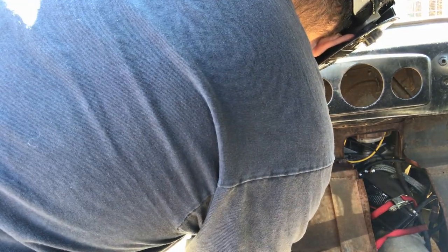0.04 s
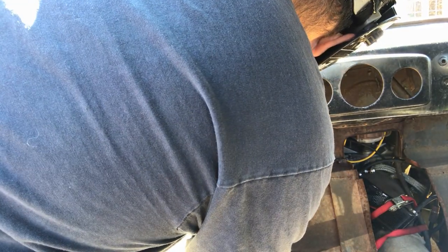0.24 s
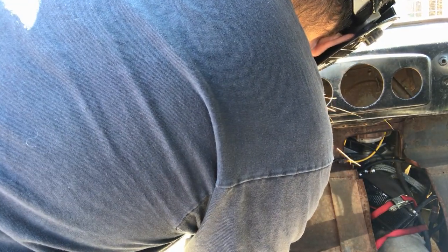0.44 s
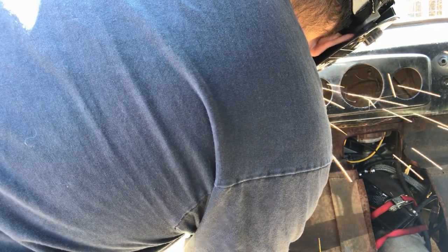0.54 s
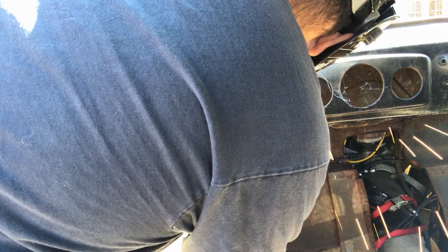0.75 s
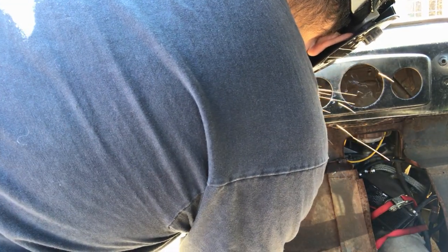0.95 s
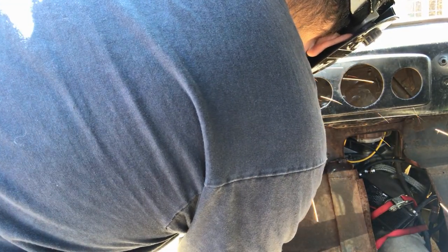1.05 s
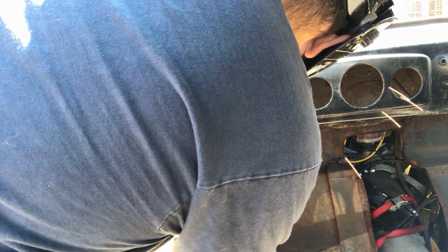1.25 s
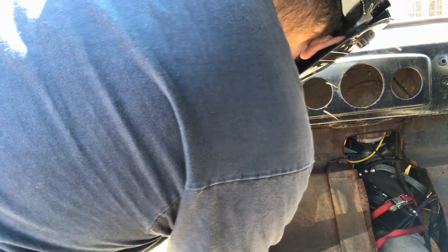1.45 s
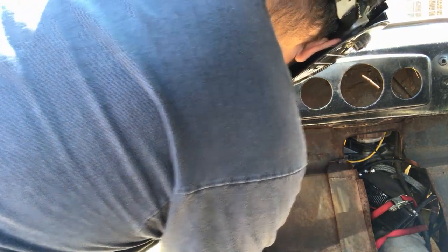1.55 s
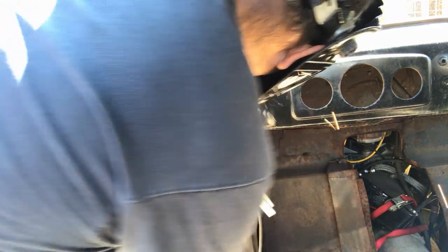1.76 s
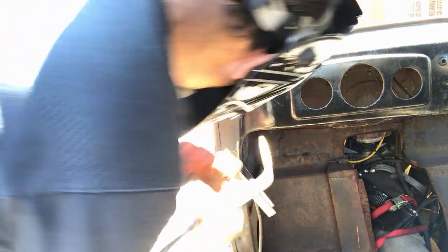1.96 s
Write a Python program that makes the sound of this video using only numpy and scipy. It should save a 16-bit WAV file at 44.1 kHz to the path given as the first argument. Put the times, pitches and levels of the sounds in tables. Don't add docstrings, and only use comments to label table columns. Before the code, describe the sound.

Close to a phone microphone, shielding gas hisses briefly before a welding arc snaps alight on a steel panel, spits sparks, and buzzes with rapid dry crackles and pops until it stops abruptly in the reverberant workshop.

```python
import sys
import numpy as np
from scipy import signal
from scipy.fft import rfft, irfft, next_fast_len
from scipy.io import wavfile
from scipy.ndimage import uniform_filter1d, map_coordinates

SR = 44100
rng = np.random.default_rng(int(sys.argv[2]) if len(sys.argv) > 2 else 0)


def file_out(sig):
    cols = np.atleast_2d(sig).T
    lim = np.clip(cols, -1, 1)
    pcm = np.round(lim * 32767).astype(np.int16)
    wavfile.write(sys.argv[1], SR, pcm)


def amplitude_ratio(level_db):
    exponent = np.asarray(level_db, float) / 20
    return 10 ** exponent


N = 88200
T = np.arange(N) / SR

# touch_s, crack_db
TOUCHES = [
    (.2236, -15.3),
    (.3106, -33),
]
# time_s, panel_ring_db, puff_db
ARC_LEVELS = [(0.329, -46, -53), (0.37, -44, -72), (0.47, -49.5, -53), (0.495, -38.5, -69),
              (0.528, -44.5, -42), (0.668, -44.5, -81), (0.684, -72, -56), (0.692, -40, -65),
              (0.756, -45.5, -61), (0.78, -37.5, -72), (0.859, -44, -64), (1.021, -39.5, -54),
              (1.07, -43.5, -62), (1.314, -42.5, -38.5), (1.463, -40, -34), (1.549, -43.5, -37.5),
              (1.641, -41.5, -33), (1.7, -40.5, -36)]
CRACK_DB = 9.5
USUAL_POP_DB = -32


def unit(x):
    return x / np.sqrt(np.mean(x ** 2) + 1e-20)


def along(points, hz):
    f, v = np.transpose(points)
    return np.interp(np.log(hz + 1), np.log(f + 1), v)


def filtered(x, response):
    m = next_fast_len(N + SR // 2)
    return irfft(rfft(x, m) * response(np.fft.rfftfreq(m, 1 / SR)), m)[..., :N]


def noise(spectrum):
    return unit(filtered(rng.standard_normal(N), lambda hz: amplitude_ratio(along(spectrum, hz))))


def impulses(s, size):
    return np.bincount(np.round(np.asarray(s) * SR).astype(int), size, N)[:N]


def workshop():
    # pitch_hz, level_db per Hz
    air_tone = [(15, -51), (40, -11), (140, -5.5), (264, -12.5), (600, -16.5), (1800, -24.5), (5000, -33),
                (9000, -43.5), (16000, -55)]
    # first_db, last_db
    air_db = (-61, -58.5)
    # pitch_hz, rms_db
    hum = [(263.8, -68), (1836, -68.5), (2363, -77)]
    swell_db = 1.3 * map_coordinates(rng.standard_normal(60), [T * 25])
    air = amplitude_ratio(np.interp(T, [0, 2], air_db) + swell_db) * noise(air_tone)
    tones = sum(np.sqrt(2) * amplitude_ratio(db) * np.sin(2 * np.pi * hz * T) for hz, db in hum)
    return air + tones * amplitude_ratio(-18 * (T > .22))


def gas():
    # pitch_hz, level_db per Hz
    gas_tone = [(350, -40), (700, -12), (1400, 0), (3300, -15), (5700, -9), (9000, -11), (11000, -15),
                (13900, -9), (16000, -15)]
    # first_db, last_db
    gas_db = (-60, -57)
    # open_s, lost_under_strike_s
    gas_s = (.128, .225)
    # start_s, end_s (fades out up to 0.018 s later), level_db over the hiss
    scrape = (.19, .196, 8.5)
    open_s, lost_s = gas_s
    scrape_s, scrape_end_s, scrape_db = scrape
    spurt_db = 6 * np.exp(-abs(T - open_s) / .006)
    scraping = (T > scrape_s) * np.clip((scrape_end_s + 0.018 - T) / 0.0023, 0, 1)
    level_db = np.interp(T, gas_s, gas_db) + spurt_db + scrape_db * scraping
    return amplitude_ratio(level_db) * (T > open_s) * (T < lost_s) * noise(gas_tone)


def room(x):
    # pitch_hz, t60_s
    decay = [(300, 0.21), (1500, 0.19), (6000, 0.16), (15000, 0.14)]
    # pitch_hz, level_db
    room_tone = [(300, -1.5), (2000, -1), (3600, 2.5), (6000, -2.5), (12500, -4.5), (14500, -6)]
    room_db, lag_s = 0.5, .004
    hz, t, z = signal.stft(rng.standard_normal((4, SR // 2)), SR, nperseg=128)
    fading = z * amplitude_ratio(-60 * t / along(decay, hz)[:, None])
    tail = signal.istft(fading, SR, nperseg=128)[1]
    tail = np.pad(tail, ((0, 0), (round(lag_s * SR), 0))) / np.linalg.norm(tail[0])
    choice = np.repeat(rng.integers(0, 4, N // 400 + 1), 400)[:N]
    place = choice == np.arange(4)[:, None]
    wet = signal.fftconvolve(x * place, tail, axes=1).sum(0)[:N]
    return amplitude_ratio(room_db) * filtered(wet, lambda hz: amplitude_ratio(along(room_tone, hz)))


def spray():
    # start_s, rms_db, rise_s, t60_s
    splashes = [
        (.2245, -26, .002, .1),
        (.424, -38, .004, .06),
        (.49, -34.5, .008, .12),
        (.535, -37, .004, .08),
        (1.19, -38, .006, .1),
    ]
    # pitch_hz, level_db per Hz
    splash_tone = [(300, 1), (1200, -0.5), (2800, 1.5), (3800, 6), (8500, 5.5), (10300, 1), (12000, 1),
                   (16000, -3.5)]
    start, level_db, rise, t60 = np.transpose(splashes)[..., None]
    after = np.maximum(T - start, 0)
    envelope = amplitude_ratio(level_db - 60 * after / t60) * (1 - np.exp(-after / rise))
    return np.sum(envelope, 0) * noise(splash_tone)


def shorts():
    # short_s, crack_db, pop_db
    uneven_shorts = [(0.3216, -15.5, -31), (0.332, -16.0, -34), (0.3389, -18.5, -35), (0.3458, -16.5, -34),
                     (0.3544, -17.0, -32), (0.3653, -17.5, -30), (0.3715, -20.5, -35), (0.3806, -17.5, -29),
                     (0.3862, -19.5, -43), (0.3955, -14.0, -29), (0.4017, -20.0, -39), (0.4173, -15.0, -29),
                     (0.4238, -16.5, -35), (0.4416, -15.5, -29), (0.4538, -16.0, -35), (0.4654, -18.5, -31),
                     (0.4726, -17.5, -47), (0.4796, -16.5, -37), (0.487, -15.5, -29), (0.4944, -16.5, -33),
                     (0.5022, -20.0, -34), (0.5095, -16.5, -35), (0.5243, -17.5, -28), (0.5392, -16.0, -30),
                     (0.5531, -17.0, -28), (0.5628, -20.5, -38), (0.5772, -15.5, -30), (0.5872, -23.5, -38),
                     (0.5942, -17.5, -36), (0.6013, -20.0, -34), (0.6096, -16.0, -27), (0.6179, -16.5, -37),
                     (0.6255, -16.0, -27), (0.6364, -21.5, -34), (0.6439, -20.0, -34), (0.6514, -15.5, -30),
                     (0.6609, -16.5, -30), (0.6688, -20.0, -36), (0.6798, -16.5, -31), (0.696, -15.5, -28),
                     (0.7051, -19.0, -38), (0.7148, -18.0, -28), (0.7238, -16.0, -31), (0.733, -18.0, -36),
                     (0.7426, -15.5, -30), (0.7533, -18.0, -32), (0.7619, -20.5, -35), (0.7731, -17.5, -27),
                     (0.7811, -19.0, -27), (0.7931, -16.0, -27), (0.8009, -16.0, -24), (0.8097, -17.5, -32),
                     (0.8196, -19.0, -31), (0.8272, -19.5, -26), (0.8358, -17.0, -29), (0.8448, -20.5, -36),
                     (0.8519, -23.5, -34), (0.8584, -20.5, -34), (0.8662, -16.0, -29), (0.8741, -22.5, -33),
                     (0.885, -15.0, -26), (0.8946, -18.0, -35), (0.9035, -23.5, -32), (0.9138, -23.0, -32),
                (0.9226, -17.5, -30), (0.9328, -15.0, -27), (0.9422, -17.5, -31), (0.9508, -16.0, -27),
                (0.9629, -16.5, -29), (0.9722, -15.0, -30), (0.9823, -15.5, -29), (0.9916, -18.0, -30),
                (1.0001, -20.5, -32), (1.0076, -19, -31), (1.0155, -19, -31), (1.0236, -17.5, -27),
                (1.032, -15.0, -27), (1.0407, -18.0, -21), (1.0488, -16.0, -26), (1.0577, -17.0, -23),
                (1.0659, -17.5, -32), (1.0742, -19.5, -32), (1.0827, -18.5, -31), (1.0902, -17.5, -32),
                (1.0994, -17.0, -27), (1.108, -18.0, -26), (1.117, -17.5, -25), (1.1251, -20.5, -34),
                (1.1326, -17.0, -27), (1.141, -15.5, -28), (1.1508, -19, -31), (1.161, -19, -31),
                (1.1706, -19.5, -29), (1.1814, -15.5, -29), (1.1912, -16.5, -30), (1.2017, -18.0, -32),
                (1.2124, -21.5, -33), (1.2257, -15.5, -28), (1.2361, -17.0, -28), (1.2469, -16.0, -27)]
    # start_s, shorts_gone_by
    runs = [(1.2569, 0), (1.278, 2), (1.2897, 3), (1.2998, 4), (1.3325, 7), (1.3556, 9), (1.3657, 10),
            (1.3753, 11), (1.4004, 14), (1.4215, 16), (1.4312, 17), (1.4392, 18), (1.4592, 20),
            (1.4783, 22), (1.499, 24), (1.5081, 25), (1.5287, 27), (1.5396, 28), (1.5579, 30), (1.5729, 32),
            (1.599, 35), (1.6062, 36), (1.6412, 40), (1.66, 42), (1.7009, 46)]
    big_drops = [
        1.3834,
        1.3919,
        1.4312,
        1.599,
        1.6153,
        1.6233,
        1.6509,
        1.6906,
        1.7009,
    ]
    run_s, gone = np.transpose(runs)
    chance = rng.standard_normal((round(gone[-1]) + 1, 3))
    s = np.interp(np.arange(len(chance)), gone, run_s) + .00012 * chance[:, 0]
    big = np.isin(np.arange(len(s)), abs(s[:, None] - big_drops).argmin(axis=0))
    crack_db = -14.5 + .8 * chance[:, 1]
    pop_db = -30.5 + 4.5 * big + 1.5 * chance[:, 2]
    rows = np.vstack([uneven_shorts, np.transpose([s, crack_db, pop_db])])
    return *rows.T, rng.standard_normal((len(rows), 2))


def touches():
    touch_s, touch_db = np.transpose(TOUCHES)
    return impulses(touch_s, amplitude_ratio(touch_db + CRACK_DB))


def air_puffs(s, chance):
    # puff_s, level_db, signed factor on the level (push +, pull -, 0 silent)
    strong_puffs = [(0.2265, -12, 1), (0.2331, -24, -0.5), (.334, -38, 0.5), (0.421, -37, -0.9),
                    (0.4445, -25.5, 0.4), (0.4686, -49, -4), (0.489, -31, -1), (0.528, -28, -0.1),
                    (0.5408, -28.5, 1.2), (0.6822, -32, -1), (0.747, -33.5, -0.5), (0.952, -29.5, 0),
                    (1.121, -32, -0.7), (1.193, -29, 0), (1.393, -20, 0), (1.511, -42.5, -3.5),
                    (1.575, -28, 0.1), (1.603, -32, 1), (1.618, -45, -4), (1.653, -28.5, -1.4),
                    (1.6912, -7, 0.2), (1.7, -22, -0.8)]
    rise_s, fall_s, lag_s = .0006, 0.0056, 0.00243
    at, _, puff_db = np.transpose(ARC_LEVELS)
    puff_s, strong_db, sign = np.transpose(strong_puffs)
    small = amplitude_ratio(np.interp(s, at, puff_db)) * (.4 * chance - 1)
    pushes = impulses(puff_s, sign * amplitude_ratio(strong_db)) + impulses(s + lag_s, small)
    t = T[:999]
    shape = (1 - np.exp(-(t / rise_s) ** 2)) * np.exp(-t / fall_s)
    return np.convolve(pushes, shape)[40:N + 40]


def drop_pops(s, pop_db):
    corner_hz, steepness = 1500, 1.05
    pops = impulses(s + 0.00038, -amplitude_ratio(steepness * (pop_db - USUAL_POP_DB)))
    return filtered(pops, lambda f: 1j * f * corner_hz ** 2 / (corner_hz + 1j * f) ** 3)


def panel_ring(s, pop_db, chance, strike):
    # pitch_hz, width_hz, level_db
    panel = [(936, 59, -7.5), (1305, 124, 2.5), (1534, 70, -15.5), (2331, 36, -5), (3780, 216, -10),
             (4647, 76, -6.5), (6250, 610, -24)]

    def modes(f):
        total = 0
        for k, (centre, width, db) in enumerate(panel):
            damping = 1j * f * width
            total = total + (-1) ** k * amplitude_ratio(db) * damping / (centre * centre - f * f + damping)
        return total

    at, ring_db, _ = np.transpose(ARC_LEVELS)
    blow_db = 1.5 * chance + 0.41 * (pop_db - USUAL_POP_DB)
    shaken = unit(filtered(impulses(s, amplitude_ratio(blow_db)), modes))
    return shaken * amplitude_ratio(-2 + np.interp(T, at, ring_db)) + amplitude_ratio(11.5) * filtered(strike, modes)


def cracks(s, crack_db, strike):
    # pitch_hz, level_db per Hz
    crack_tone = [(180, -20), (500, -9), (1250, -19.5), (2840, -3.5), (4200, -4), (7080, -0.5), (10000, 0),
                  (11700, -3.5), (16000, -3.5)]
    # delay_s, gain
    near_edges = [(.00009, 0.42), (.00016, 0.46), (.000305, -0.93), (.00039, -.45), (.00088, 0.022)]
    # delay_s, gain
    walls = [(.00065, .14), (.001, -.14), (.00185, .15), (.0027, -.24), (.0031, .13), (.0042, .17)]
    stretch = 1 + .035 * np.array([[-1], [-.5], [0], [.5], [1]])
    foot = rng.integers(0, len(stretch), N) == np.arange(len(stretch))[:, None]

    def response(hz):
        echoes = 1
        for delay_s, gain in [*near_edges, *walls]:
            echoes = echoes + gain * np.exp(-2j * np.pi * hz * delay_s * stretch)
        return amplitude_ratio(along(crack_tone, hz)) * echoes

    clicks = impulses(s, amplitude_ratio(crack_db + CRACK_DB)) + strike
    return filtered(foot * clicks, response).sum(0)


def drifting_bands(x):
    # pitch_hz, width_hz, first_db, last_db
    bands = [(3060, 1130, -7.5, 1), (4500, 400, 2.5, 2), (4830, 330, -9.5, -7.5), (6320, 360, -13, -13),
             (6900, 560, 11.5, 4.5), (8200, 820, -5.5, -4), (10400, 460, -19.5, -12),
             (10730, 650, -1, -4), (13250, 600, 9, 9.5), (14200, 800, -1, 0.5), (15400, 420, 11, 8)]

    def shade(f):
        bells = (np.outer([a, b], np.exp(-.5 * ((f - c) / w * 2) ** 2)) for c, w, a, b in bands)
        return amplitude_ratio(sum(bells))

    first, last = filtered(x, shade)
    moved = np.interp(T, [.6, 1.4], [0, 1])
    return first * (1 - moved) + last * moved


def arc():
    s, crack_db, pop_db, chance = shorts()
    strike = touches()
    struck = cracks(s, crack_db, strike) + panel_ring(s, pop_db, chance[:, 0], strike)
    direct = drifting_bands(struck) + spray()
    return direct + room(direct) + drop_pops(s, pop_db) + air_puffs(s, chance[:, 1])


def scene():
    return (arc() + gas() + workshop())[None]


def thin_briefly(x):
    thinned = [
        .2135,
        1.011,
        1.160,
        1.522,
    ]
    _, t, z = signal.stft(x, SR, nperseg=512, noverlap=448)
    for s in thinned:
        share = np.clip(2 - 2 * abs(t - s) / .008, 0, 1)
        power = np.sum(abs(z) ** 2 * share, -1)
        level = np.log(uniform_filter1d(power, size=4) + 1e-20)
        level -= uniform_filter1d(level, size=60)
        weak = level < np.quantile(level[:, :185], .78)
        z = z * amplitude_ratio(np.where(weak, -18, 3.5)[..., None] * share)
    return signal.istft(z, SR, nperseg=512, noverlap=448)[1][:, :N]


def band_limit(x):
    return signal.sosfilt(signal.butter(12, 17140, fs=SR, output="sos"), x)


def record(dry):
    top_hz, edge_hz, above_top_db = 15850, 110, -70
    x = signal.sosfilt(signal.butter(4, 49.7, "high", fs=SR, output="sos"), dry)
    x = thin_briefly(x)
    x = filtered(x, lambda hz: amplitude_ratio(above_top_db * np.clip((hz - top_hz) / edge_hz, 0, 1)) * (hz < 16600))
    return band_limit(x)


dry = scene()
out = record(dry)
file_out(out)
```